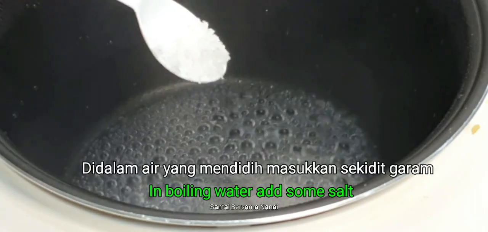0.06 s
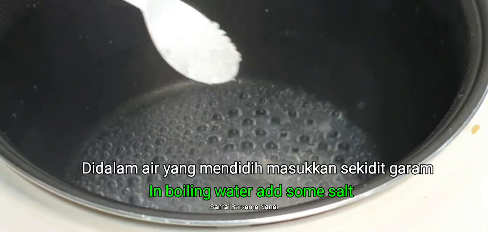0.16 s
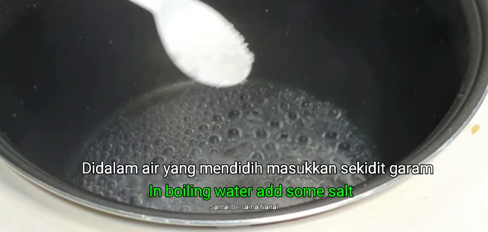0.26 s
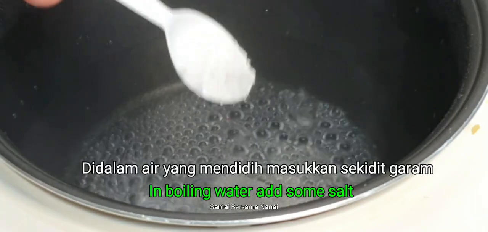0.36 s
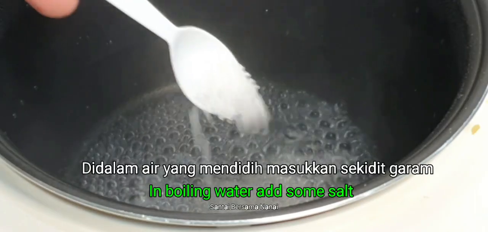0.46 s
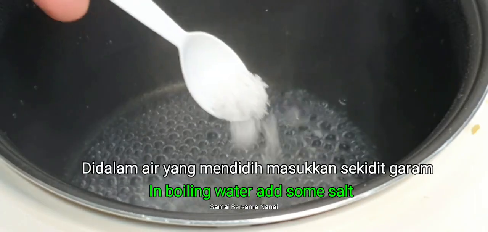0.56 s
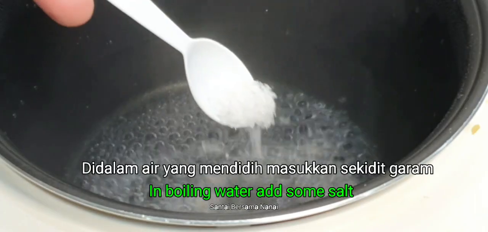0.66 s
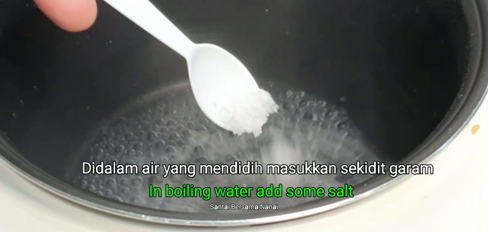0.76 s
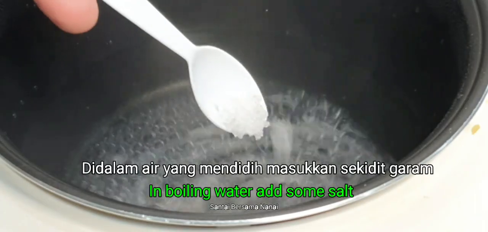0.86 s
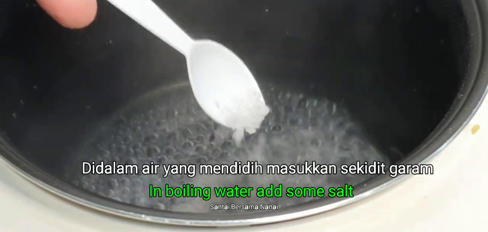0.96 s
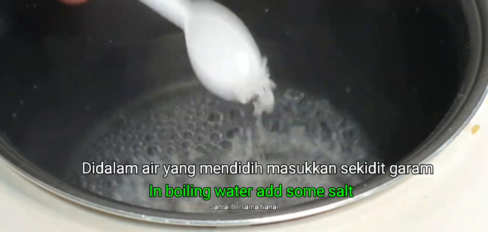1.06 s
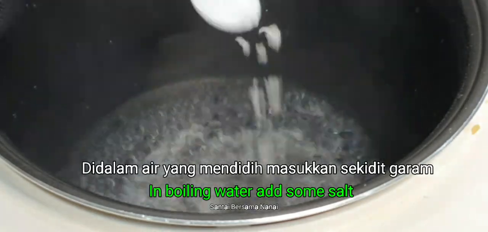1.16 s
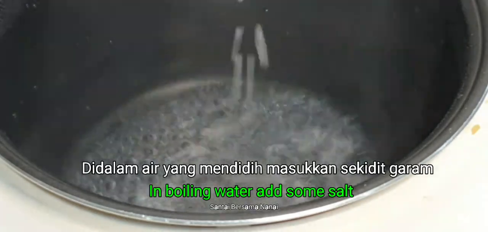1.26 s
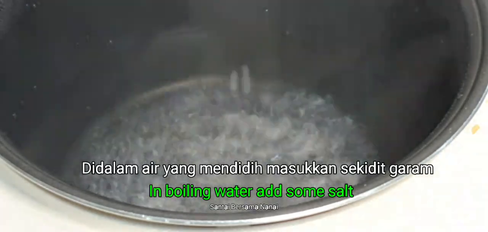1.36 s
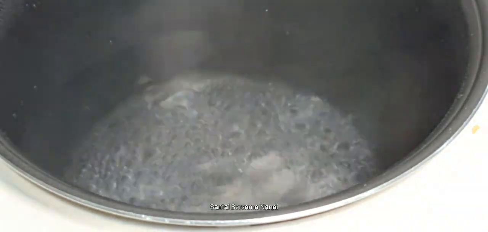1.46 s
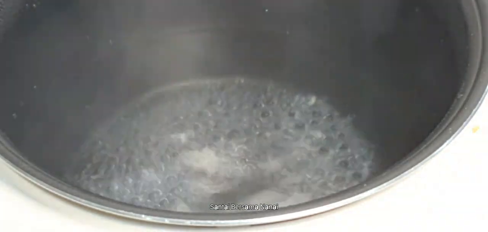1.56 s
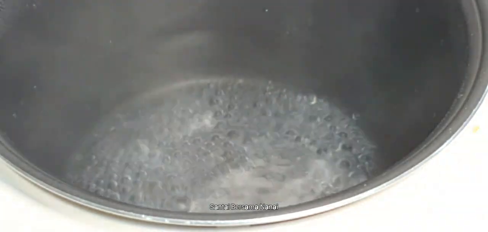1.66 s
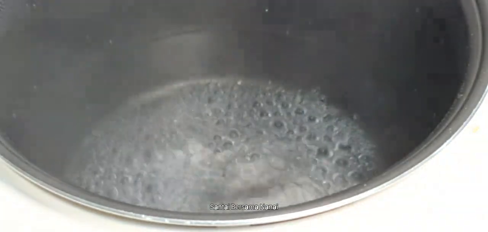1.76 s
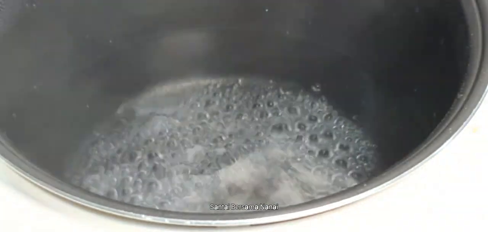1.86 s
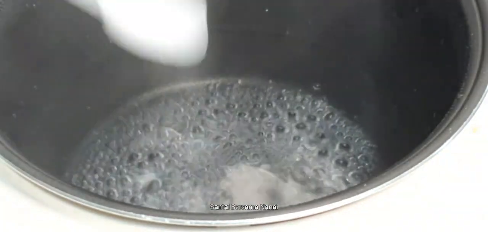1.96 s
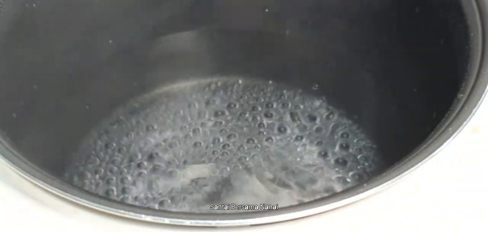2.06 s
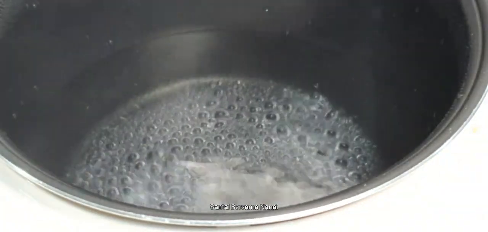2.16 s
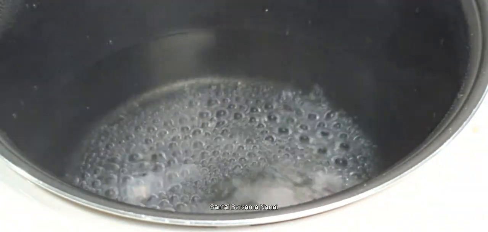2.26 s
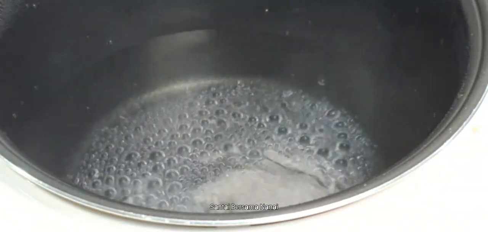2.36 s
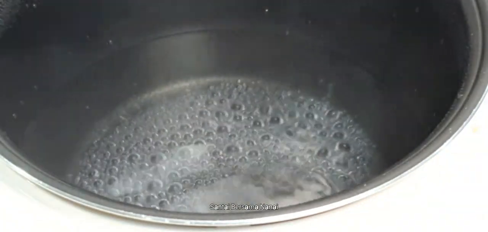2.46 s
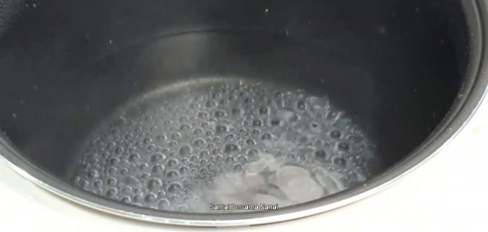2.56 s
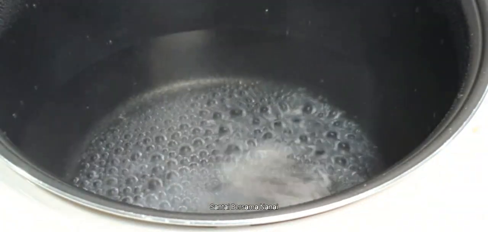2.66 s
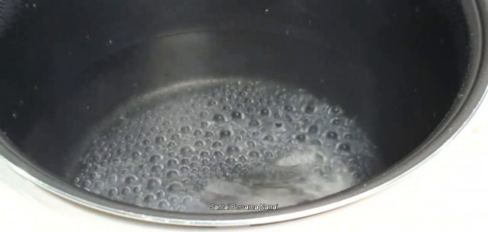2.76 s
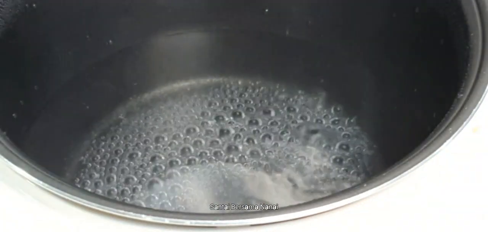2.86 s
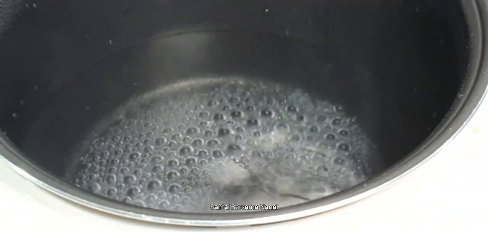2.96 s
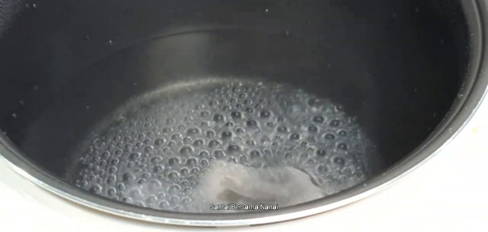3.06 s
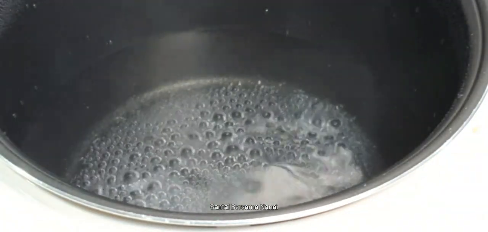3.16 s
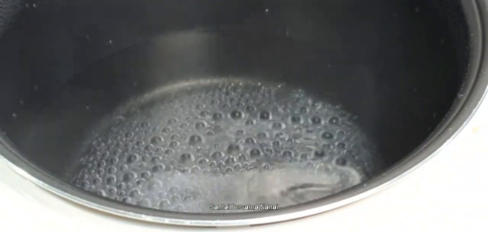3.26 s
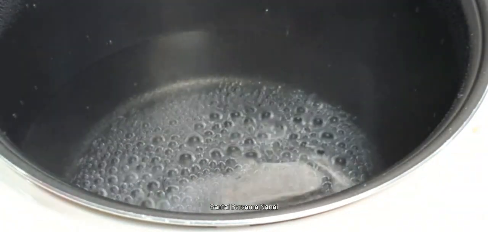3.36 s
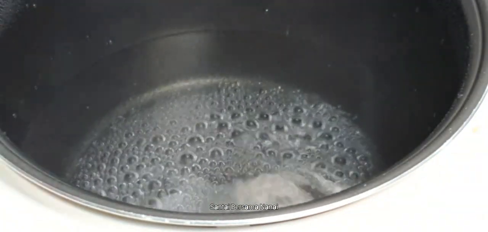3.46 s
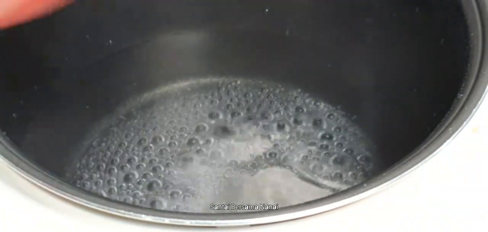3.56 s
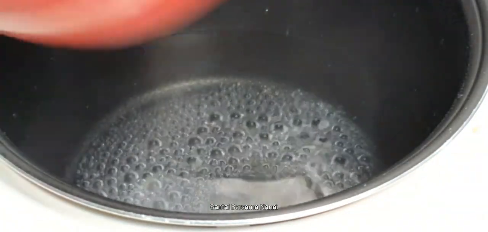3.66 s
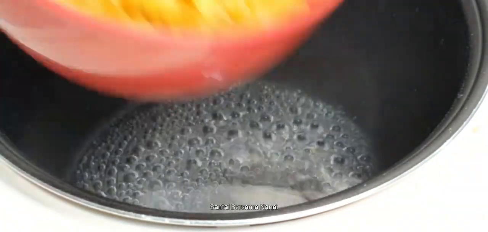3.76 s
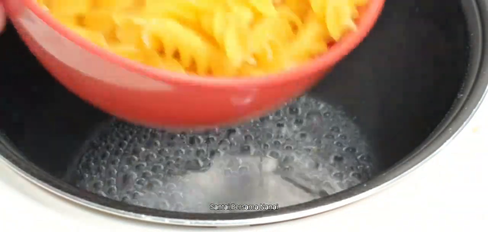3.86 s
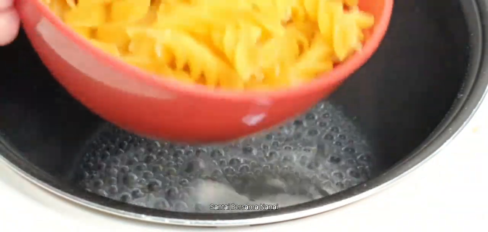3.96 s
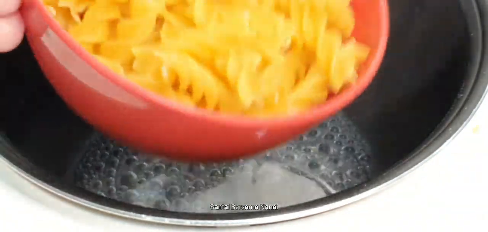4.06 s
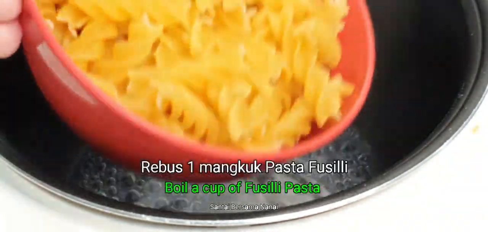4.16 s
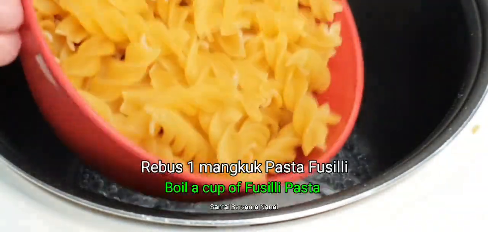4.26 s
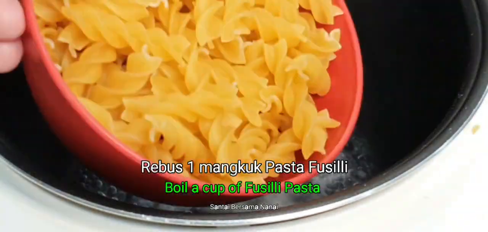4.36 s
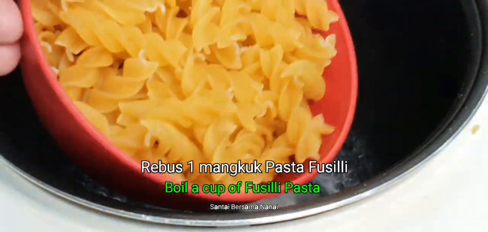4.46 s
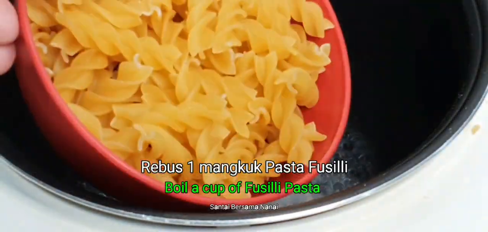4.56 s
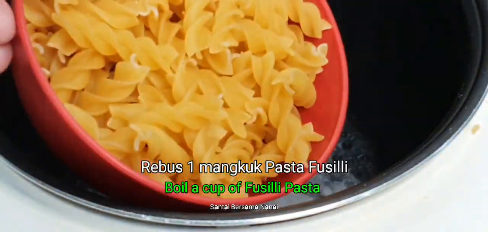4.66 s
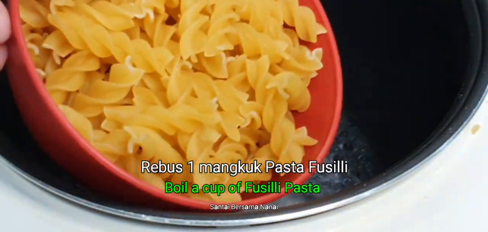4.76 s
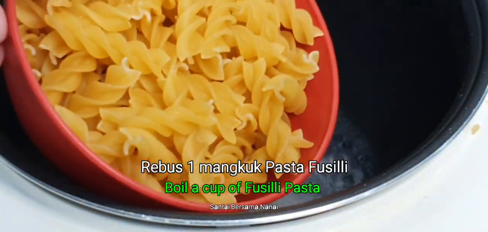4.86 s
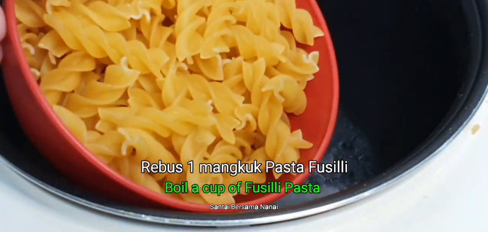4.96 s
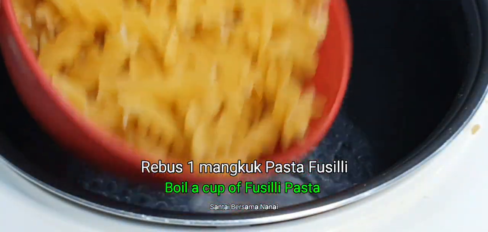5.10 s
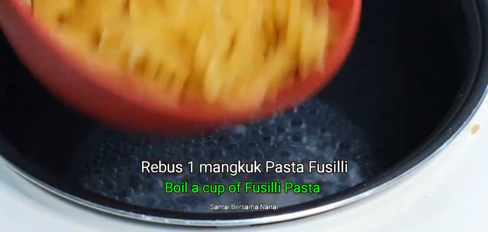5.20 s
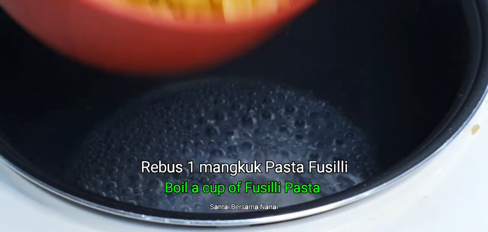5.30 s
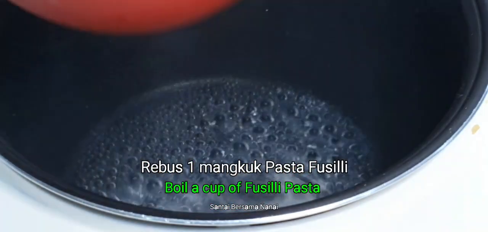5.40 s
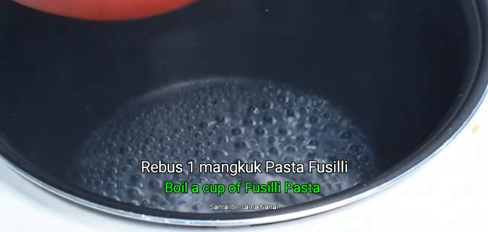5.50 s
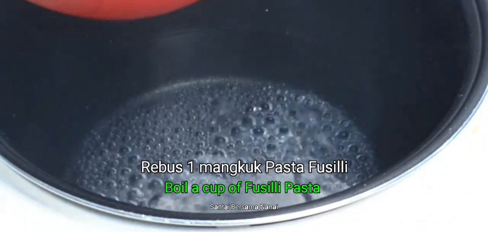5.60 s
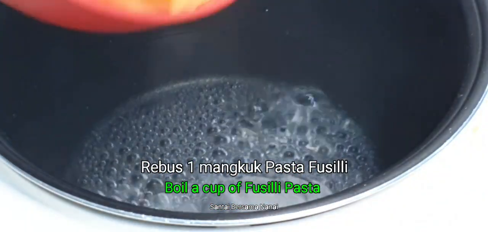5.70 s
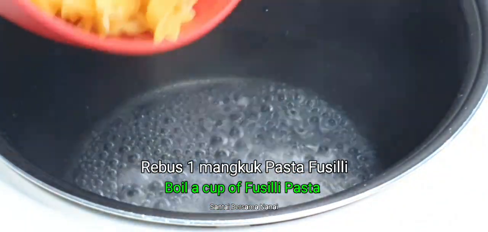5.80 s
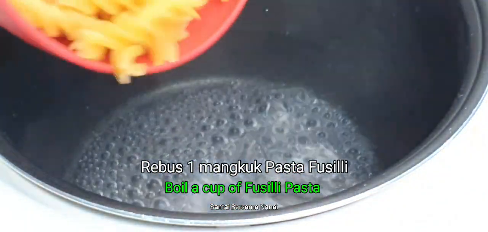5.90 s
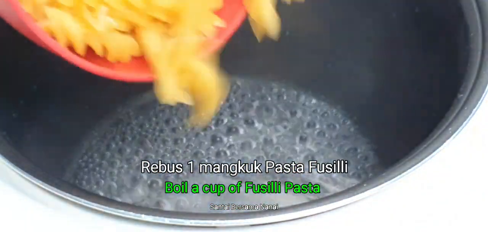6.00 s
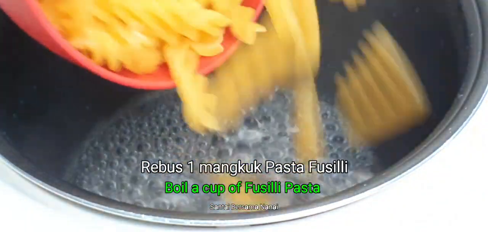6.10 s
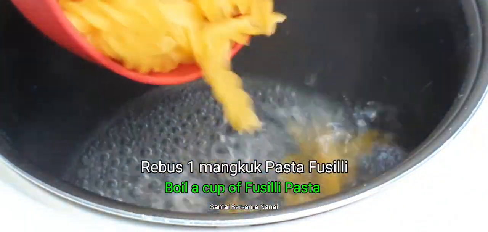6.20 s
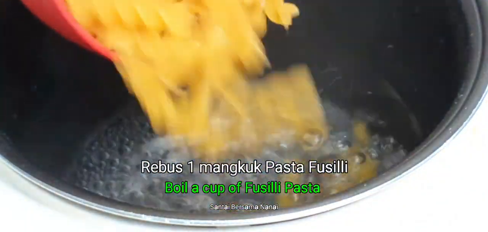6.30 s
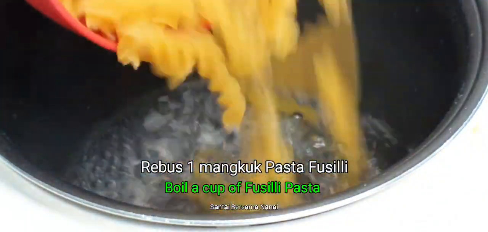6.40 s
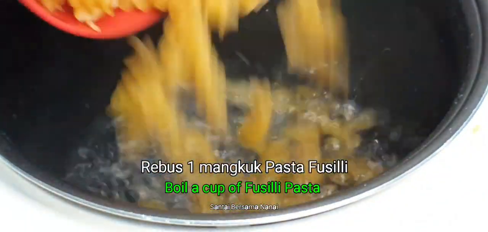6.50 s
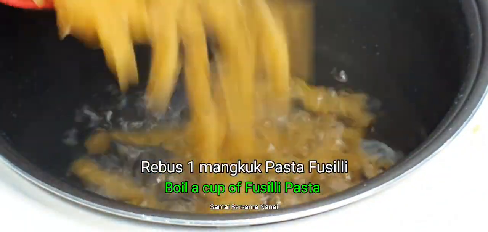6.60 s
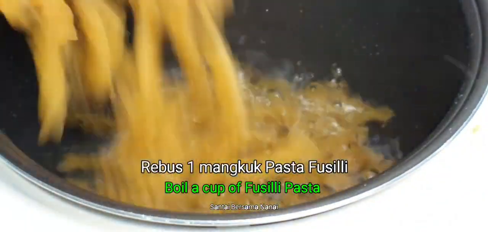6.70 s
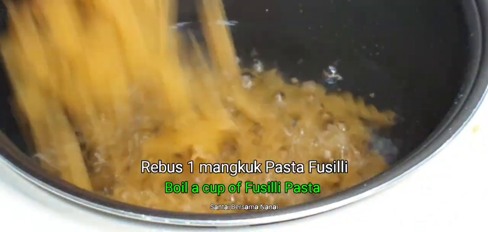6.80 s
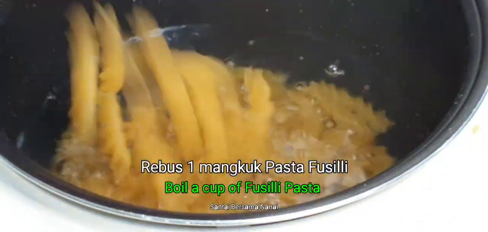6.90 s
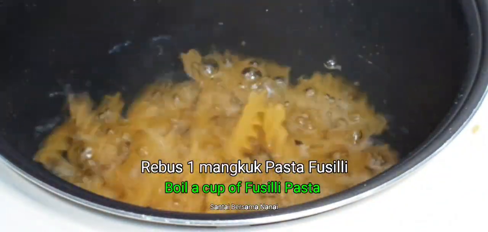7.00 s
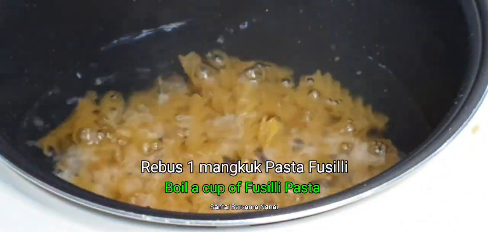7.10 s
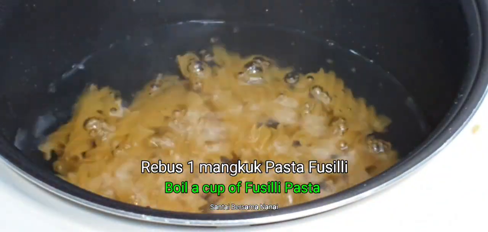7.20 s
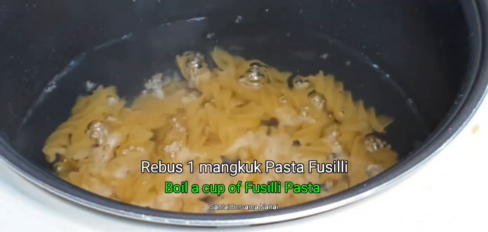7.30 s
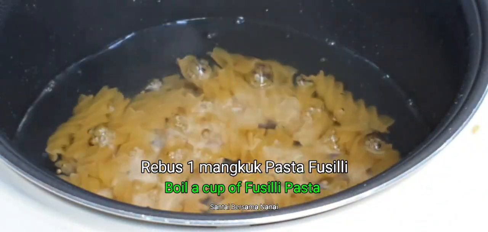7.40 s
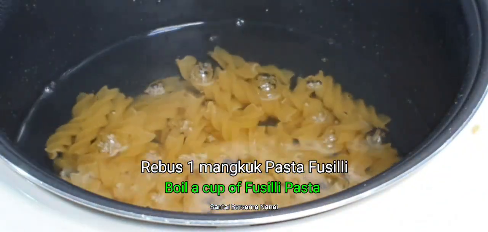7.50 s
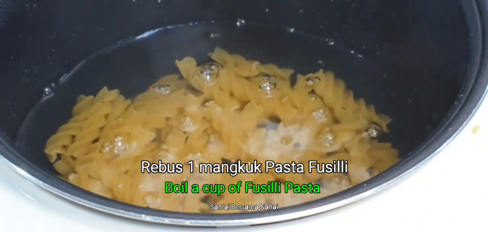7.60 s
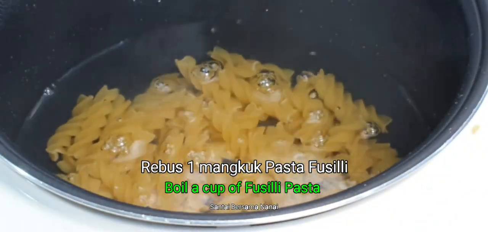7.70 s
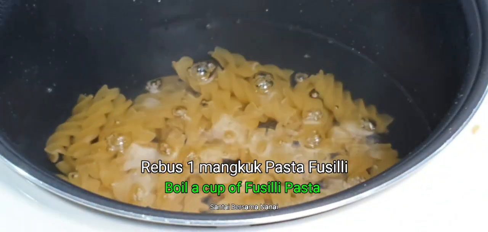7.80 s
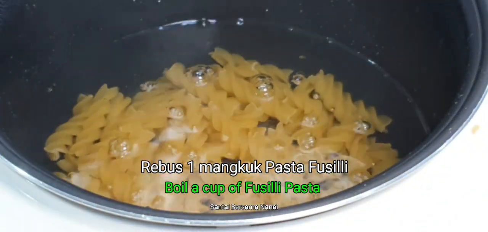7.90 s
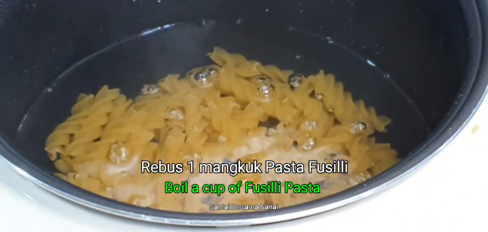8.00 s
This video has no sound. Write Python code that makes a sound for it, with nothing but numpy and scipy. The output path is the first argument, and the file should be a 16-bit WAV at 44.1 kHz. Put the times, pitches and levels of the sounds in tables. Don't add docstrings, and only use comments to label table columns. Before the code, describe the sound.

Dry pasta ticks lightly in a plastic bowl, then rattles in one loud rush into a pot of water, over a low kitchen hum.

```python
import sys
import numpy as np
from scipy import signal
from scipy.fft import rfft, irfft, next_fast_len
from scipy.io import wavfile

SR = 44100
rng = np.random.default_rng(int(sys.argv[2]) if len(sys.argv) > 2 else 0)


def wrap_up_sound(samples):
    columns = np.atleast_2d(samples).T
    tamed = np.clip(columns, -1, 1)
    steps = np.round(tamed * 32767).astype(np.int16)
    wavfile.write(sys.argv[1], SR, steps)


def voltage_ratio(level):
    return 10 ** (np.asarray(level, float) / 20)


N = 354953

SHAFT_HZ, MAINS_HZ = 17.493, 100.06
BOWL_PAN_DB, POUR_PAN_DB = 2, 5.5
RISE_DB = 19.5
SLIP_DULL_DB, SURGE_DULL_DB, FLOW_DULL_DB = -8, -20, -1.5
TRICKLE_HZ = 8000

# multiple of the shaft speed, centre level in dB, left-right difference in dB.
SHAFT_ORDERS = [(3, -57.2, -76.0), (4, -53.3, -72.7), (5, -59.4, -76.0), (6, -51.7, -71.3),
                (7, -60.8, -87.1), (8, -51.8, -88.5), (9, -59.6, -81.2), (10, -52.3, -89.9),
                (11, -58.0, -67.1), (13, -59.1, -67.0), (14, -69.2, -74.3), (16, -68.1, -74.2),
                (17, -64.3, -81.2), (20, -67.6, -67.7), (24, -77.3, -69.4), (31, -68.1, -77.6),
                (32, -66.3, -77.8), (37, -80.3, -60.9), (40, -73.2, -62.5), (47, -69.3, -63.6)]
# frequency in Hz, centre level in dB, left-right difference in dB.
APPLIANCE_TONES = [(92.9, -57.5, -86.6), (128.5, -61.6, -82.7), (146.9, -65.8, -89.5),
                   (200.1, -69.8, -86.3), (220.7, -71.3, -82.5), (300.1, -61.5, -76.1),
                   (440.8, -65.6, -69.7), (600.2, -67.3, -77.4), (734.5, -71.5, -78.6)]
# time in seconds, level in dB.
MAINS_SWELL = [
    (0.0, -53.0),
    (1.5, -46.1),
    (3.0, -40),
    (3.9, -38),
    (5.5, -41.5),
    (6.8, -38.5),
    (8.0, -40.6),
]
# frequency in Hz, centre level in dB per Hz, left-right difference in dB per Hz.
AIR_NOISE = [(20, -81, -110), (60.4, -70, -85.5), (103, -67, -113), (197, -73.5, -84.5), (380, -80.5, -79),
             (514, -82, -84.5), (676, -79, -76.5), (1100, -88, -82.5), (1070, -82.5, -79),
             (1296, -89.5, -85.5), (2565, -100, -100), (3040, -97, -95.5), (5500, -110, -110),
             (8000, -112, -112), (10400, -119, -119)]
# frequency in Hz, level in dB, decay by 60 dB in seconds.
BOWL_MODES = [(1150, -17, 0.004), (1930, 1, 0.018), (2580, -31, 0.041), (3170, -54, 0.01), (3770, 2, 0.11),
              (4820, -8.5, 0.032), (5440, 6, 0.083), (6060, 0.5, 0.018), (7000, -8, 0.014),
              (7620, 1.5, 0.011), (8350, -1, 0.015), (9660, 3.5, 0.014)]
# frequency in Hz, level in dB.
CRACK_COLOUR = [(290, -35), (500, -52), (788, 0), (1810, -1.5), (2440, 3.5), (3470, -5.5), (4870, 2.5),
                (8090, -2.5), (11200, -9), (14600, -26), (22000, -120)]
# start in seconds, peak in dB, strongest ring in Hz, weight of the blow in dB.
BOWL_TICKS = [(0.9388, -51, 3210, -8), (1.1403, -46, 9120, -8), (1.7254, -55, 3200, -6),
              (2.619, -39, 3930, -2), (2.7404, -47, 7470, -6), (2.7891, -34, 3400, -11),
              (2.822, -45, 3340, -6), (2.996, -23.5, 5450, -15), (3.0024, -30, 3540, -10),
              (3.0204, -41, 7900, -14), (3.0734, -41, 3270, -6), (3.1336, -40, 5400, 1),
              (3.1767, -44, 4110, -6), (3.1824, -34, 3940, -3), (3.198, -41, 3680, -8),
              (3.3644, -49, 7280, -6), (3.3834, -53, 3560, -6), (3.682, -37.5, 5430, -1),
              (4.226, -51, 3360, -7), (4.3784, -54, 3560, -6), (5.3677, -49, 3490, -6),
              (5.4964, -40.5, 6800, -6), (5.5214, -40, 5330, -6), (5.5274, -39, 5360, 0),
              (5.5493, -38.5, 5440, 8), (5.854, -49, 5180, -9), (7.2712, -24.5, 6500, -13),
              (7.3077, -31.5, 3320, -15), (7.6084, -47, 4950, -6), (8.0305, -37, 3770, -7)]
# start in seconds, peak in dB, strongest ring in Hz, weight of the blow in dB.
POUR_KNOCKS = [(6.1247, -21.5, 5800, -13), (6.1334, -27, 4930, -19), (6.1986, -26.5, 3960, -8),
               (6.2299, -16.5, 5370, -18), (6.2446, -19.5, 5950, 1), (6.2679, -17.5, 5880, -8),
               (6.2869, -13.5, 5600, -18), (6.2924, -10.5, 5680, -14), (6.364, -29, 5900, -14),
               (6.387, -14.5, 3050, -12), (6.4004, -24.5, 6850, -8), (6.4661, -21, 6180, -11),
               (6.4936, -18, 6090, -21), (6.557, -17.5, 5750, -13), (6.6533, -20.5, 4820, -6),
               (6.6893, -21, 5040, -3), (6.7572, -22.5, 4870, 10), (6.778, -25, 6030, -15),
               (6.8003, -18.5, 5900, -6), (6.9166, -13, 5030, -26), (6.9288, -14, 4790, -17),
               (6.9935, -14, 5700, -12), (7.004, -13, 4800, -19), (7.0223, -15, 4880, -12),
               (7.0546, -14, 7880, -14), (7.0713, -11.5, 5440, -12.5), (7.111, -33, 7400, -8),
               (7.1454, -15, 4020, -13), (7.224, -22, 5340, -19), (7.3413, -26.5, 5600, -16)]
# peak time in seconds, rise in seconds, peak in dB, fall in dB per second.
GRAIN_TRICKLES = [
    (0.94, .005, -66.5, 61),
    (1.14, .005, -69, 122),
    (1.566, .025, -68, 90),
    (1.726, .005, -69, 300),
    (2.75, 0.087, -63, 500),
    (3.385, 0.049, -70, 170),
]
# peak time in seconds, rise in seconds, peak in dB, fall in dB per second.
BOWL_SLIPS = [
    (2.79, .01, -50, 900),
    (2.82, .02, -67, 100),
    (3.012, .005, -55.5, 150),
    (3.18, 0.041, -51, 350),
    (4.17, .02, -68, 40),
    (4.3, 0.037, -83, 300),
    (5.49, .05, -60.5, 100),
    (5.54, .04, -73, 500),
    (5.862, 0.049, -64, 150),
    (8.03, 0.025, -61, 200),
]
# peak time in seconds, rise in seconds, peak in dB, fall in dB per second.
POUR_SURGES = [
    (6.13, 0.0045, -38.5, 500),
    (6.232, .015, -35, 400),
    (6.29, 0.035, -32.5, 453),
    (6.394, 0.024, -46, 100),
    (6.558, 0.017, -33.5, 100),
    (6.8, 0.0056, -33, 200),
    (6.916, .006, -32.5, 150),
    (6.992, 0.03, -28.5, 84.6),
    (7.156, 0.037, -30.5, 403),
]
# time in seconds, flow in dB.
POUR_FLOW = [
    (6.12, -59),
    (6.22, -41.5),
    (6.34, -48.5),
    (6.42, -40),
    (6.72, -36),
    (6.9, -34),
    (7.1, -37),
    (7.2, -40.5),
    (7.4, -72),
]
# start in seconds, peak in dB, tone in Hz, left-right balance in dB, decay by
# 60 dB in seconds.
AIR_POCKETS = [(3.1737, -44, 1260, 13, 0.12), (5.548, -43, 2530, 4.0, 0.064), (5.9694, -48, 1390, 10, 0.07),
               (6.25, -28, 2590, 14, 0.058), (6.402, -16, 2750, -3, 0.053), (6.4833, -29, 2420, 9, 0.077),
               (6.5989, -20.5, 1330, 8, 0.023), (6.875, -18.5, 925, 6, 0.026), (6.734, -19, 2440, 4, 0.051),
               (6.8441, -19, 2340, 1.5, 0.049), (6.8755, -10.5, 2000, 9, 0.015),
               (7.0184, -17.5, 2947, -3, 0.07), (7.0526, -30.5, 1575, 20, 0.06),
               (7.077, -22, 2860, -4.5, 0.07), (7.113, -21, 2540, 6, 0.097), (7.146, -16, 2500, 9, 0.065),
               (7.2053, -24, 2929, 5.5, 0.39), (7.158, -20.5, 1620, 2, 0.047),
               (7.307, -35, 2417, 12, 0.042)]
# frequency in Hz, level in dB, decay by 60 dB in seconds.
POT_MODES = [(802, -9, .15), (1188, -8, .2), (1570, -12, .1), (2286, -9, .12), (2386, -7, .15),
             (2509, -10, .1), (2929, -9, .22), (3779, -8, .08), (4817, -3, .1), (4984, -7, .1),
             (5367, -8, .06), (5737, -6, .07), (5998, -5, .08), (7168, -8, .07), (7814, -7, .06),
             (8400, -9, .06)]
# frequency in Hz, decay by 60 dB in seconds.
KITCHEN_DECAY = [(500, .45), (2000, .4), (5000, .35), (11000, .25)]


def evened(x):
    return x / np.sqrt(np.mean(x ** 2) + 1e-20)


def shaped(x, points, column=1):
    table, size = np.array(points), next_fast_len(x.shape[-1])
    hz = np.fft.rfftfreq(size, 1 / SR)
    gain = voltage_ratio(np.interp(np.log(hz + 1), np.log(table[:, 0] + 1), table[:, column]))
    return irfft(rfft(x, size) * gain, size)[..., :x.shape[-1]]


def level(rows):
    s, db = np.transpose(rows)
    return voltage_ratio(np.interp(np.arange(N) / SR, s, db, left=-200, right=-200))


def swells(rows):
    t, out = np.arange(N) / SR, np.zeros(N)
    for s, rise, db, fall_db in rows:
        near = slice(max(int((s - rise) * SR), 0), int((s + 50 / fall_db) * SR))
        climb = RISE_DB * (t[near] - s) / rise
        fall = fall_db * (s - t[near])
        out[near] += voltage_ratio(db + np.minimum(climb, fall))
    return out


def drift(hz):
    t = np.arange(0, N + 500, 500) / SR
    wave = sum(np.sin(2 * np.pi * (f * t + rng.random())) for f in hz * np.geomspace(.1, 1, 5))
    return np.interp(np.arange(N) / SR, t, wave / 2)


def placed(events, trim_db):
    out = np.zeros((2, N + 4096))
    for s, db, pan_db, sound in events:
        at = round(s * SR)
        gain = voltage_ratio(db + trim_db + np.array([[.5], [-.5]]) * pan_db)
        out[:, at:at + sound.shape[-1]] += gain * sound
    return out[:, :N]


def rings(hz, db, t60):
    t = np.arange(6000) / SR
    decay = voltage_ratio(db[..., None] - 60 * t / t60[..., None])
    return (decay * np.sin(2 * np.pi * hz[..., None] * t)).sum(-2)


def shower(sounds, per_s, size_db, pan_db, count):
    size = voltage_ratio(size_db * np.minimum(rng.exponential(1, count), 5))
    hits = size * (rng.random(count) < per_s / SR)
    place = voltage_ratio(np.array([[1], [-1]]) * rng.normal(pan_db / 2, 3.34, count))
    kind = rng.integers(0, len(sounds), count)
    fired = np.zeros((2, count))
    for k, sound in enumerate(sounds):
        fired += signal.oaconvolve(hits * place * (kind == k), np.atleast_2d(sound), axes=1)[:, :count]
    return np.pad(evened(fired), ((0, 0), (N - count, 0)))


def hum():
    t = np.arange(N) / SR
    white = rng.standard_normal((2, N)) * np.sqrt(SR / 2)
    mid, side = shaped(white[0], AIR_NOISE, column=1), shaped(white[1], AIR_NOISE, column=2)
    tones = [(k * SHAFT_HZ * t + k * k / 50, m, s) for k, m, s in SHAFT_ORDERS]
    tones += [(hz * t, m, s) for hz, m, s in APPLIANCE_TONES]
    for turns, mid_db, side_db in tones:
        waver = np.sqrt(2) * (1 + 0.11 * drift(hz=1.44))
        mid = mid + voltage_ratio(mid_db) * waver * np.sin(2 * np.pi * turns)
        side = side + voltage_ratio(side_db) * waver * np.cos(2 * np.pi * turns)
    mains = np.sin(2 * np.pi * (MAINS_HZ * t + 36 / 50 + .5))
    held = [(9, MAINS_SWELL[-1][1])]
    mid = mid + np.sqrt(2) * level(list(MAINS_SWELL) + held) * mains
    return np.array([mid + side, mid - side]) * voltage_ratio([[.4], [-.4]])


def contact(ring_hz, low_db, crack_db=5.5, ring_db=-8.0, spread_db=-4.5, ear_db=8.0, detune=0.059):
    t, (hz, db, t60) = np.arange(1024) / SR, np.transpose(BOWL_MODES)
    chance, noise = rng.standard_normal((4, len(hz))), rng.standard_normal((3, len(t)))
    db = db + spread_db * chance[0] + ear_db * chance[2:] + low_db * (hz < 3500)
    modes = rings(hz * (1 + detune * chance[1]), db, t60)[:, :len(t)]
    crack = shaped(noise[0] + 2.8 * noise[1:], CRACK_COLOUR)
    crack = shaped(crack, [(2800, low_db + 13.5), (4200, 0.0061)])
    own = np.sin(2 * np.pi * ring_hz * t)
    sound = modes / abs(modes).max() + voltage_ratio(crack_db) * crack / abs(crack).max() + voltage_ratio(ring_db) * own
    sound = sound * np.minimum(t / .0006, 1) * np.exp(-(t / .0033) ** 2)
    return sound / abs(sound).max()


def knocks(rows, trim_db, pan_db):
    return placed([(s, db, pan_db, contact(hz, low_db)) for s, db, hz, low_db in rows], trim_db)


def rattle():
    pieces = [contact(hz, 0) for hz in np.geomspace(2300, 6500, 14)]
    dense = shower(pieces, per_s=2000, size_db=3.0, pan_db=2.5, count=N)
    dull = signal.sosfilt(signal.butter(3, [1900, 3100], "band", fs=SR, output="sos"), dense)
    bright = signal.sosfilt(signal.butter(3, 4000, "high", fs=SR, output="sos"), dense)
    thin = signal.sosfilt(signal.butter(4, TRICKLE_HZ, "high", fs=SR, output="sos"), dense)
    slips, surges, flow = swells(BOWL_SLIPS), swells(POUR_SURGES), level(POUR_FLOW)
    dull_gain = voltage_ratio(SLIP_DULL_DB) * slips + voltage_ratio(SURGE_DULL_DB) * surges + voltage_ratio(FLOW_DULL_DB) * flow
    mix = (slips + surges + flow) * evened(bright) + dull_gain * evened(dull)
    return voltage_ratio(0.5) * (mix + swells(GRAIN_TRICKLES) * evened(thin))


def kitchen(x):
    taps = np.zeros((2, SR // 2))
    at = np.arange(80, SR // 2 - 20, 20) + rng.integers(0, 20, (2, (SR // 2 - 81) // 20))
    np.put_along_axis(taps, at, rng.choice([-1., 1.], at.shape), 1)
    hz, t, z = signal.stft(taps, SR, nperseg=128)
    t60 = np.interp(hz, *np.transpose(KITCHEN_DECAY))[:, None]
    tail = signal.istft(z * voltage_ratio(-60 * t / t60), SR, nperseg=128)[1]
    return signal.fftconvolve(x, tail / np.linalg.norm(tail[0]), axes=1)[:, :N]


def air_pocket(hz, t60):
    t = np.arange(4096) / SR
    tone = np.sin(2 * np.pi * hz * t * (1 + .1 * t))
    return tone * voltage_ratio(-60 * t / max(t60, .005)) * np.minimum(t / .001, 1)


def splash():
    pockets = [voltage_ratio(4.9 * np.log2(hz / 1000)) * air_pocket(hz, 11 / hz) for hz in np.geomspace(720, 1850, 20)]
    small = shower(pockets, per_s=2200, size_db=3.5, pan_db=10.5, count=2 * SR)
    large = placed([(s, db, pan_db, air_pocket(hz, t60)) for s, db, hz, pan_db, t60 in AIR_POCKETS], trim_db=-4)
    return voltage_ratio(-7.0) * (level(POUR_FLOW) + voltage_ratio(-9.0) * swells(POUR_SURGES)) * small + large


def pot(x):
    hz, db, t60 = np.transpose(POT_MODES)
    ear_db = np.array([[1], [-1]]) * rng.normal(0, 2, len(hz))
    wall = rings(hz, db + ear_db, t60)
    return signal.fftconvolve(x, wall / np.linalg.norm(wall[0]), axes=1)[:, :N]


def scene():
    pour = knocks(POUR_KNOCKS, trim_db=2.0, pan_db=POUR_PAN_DB) + rattle() + splash()
    pour = pour + voltage_ratio(-16.5) * pot(pour)
    pour = np.array([pour[0], np.roll(pour[1], 6)])
    pasta = knocks(BOWL_TICKS, trim_db=2.5, pan_db=BOWL_PAN_DB) + pour
    return hum() + pasta + voltage_ratio(-7.5) * kitchen(pasta)


def band_limit(x):
    return signal.sosfilt(signal.butter(12, 12170, fs=SR, output="sos"), x)


def record(dry):
    shelved = shaped(dry, [(9000, 0), (11300, -4), (11550, -17), (12000, -20), (12200, -67)])
    return band_limit(shelved)


dry = scene()
out = record(dry)
wrap_up_sound(out)
```